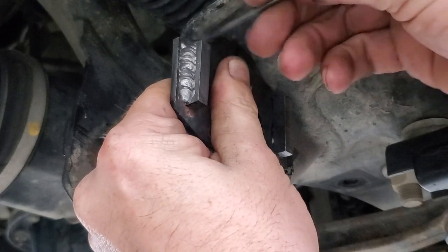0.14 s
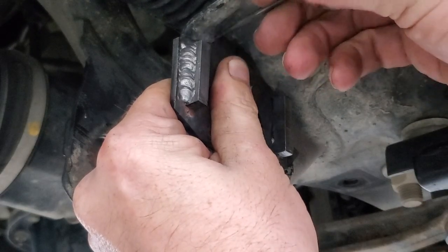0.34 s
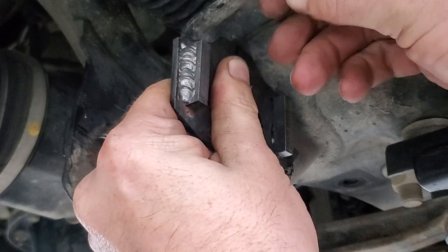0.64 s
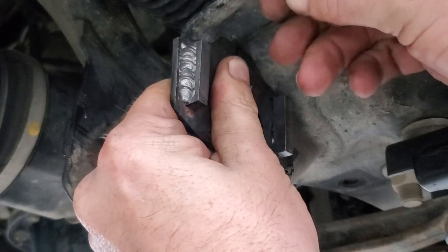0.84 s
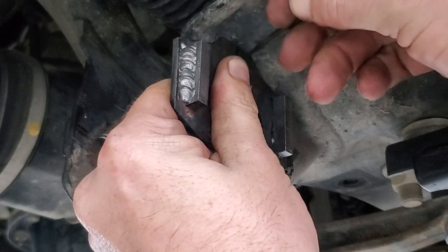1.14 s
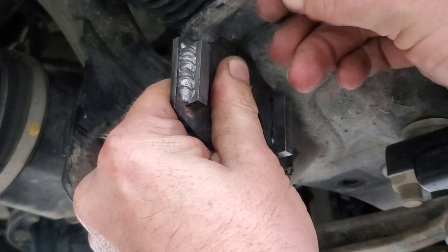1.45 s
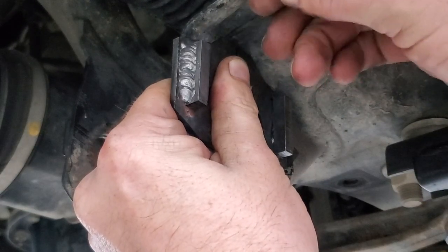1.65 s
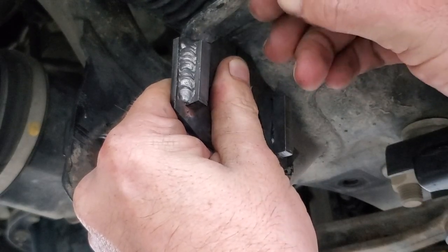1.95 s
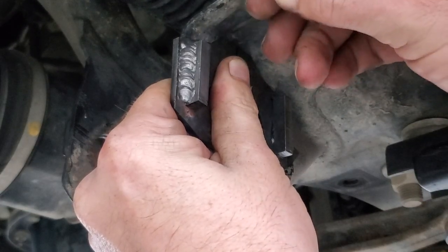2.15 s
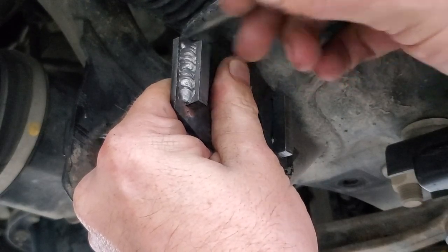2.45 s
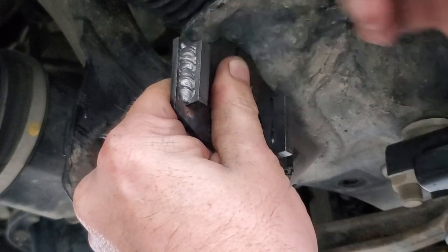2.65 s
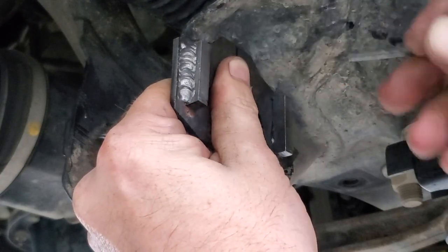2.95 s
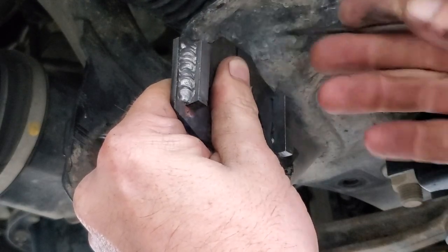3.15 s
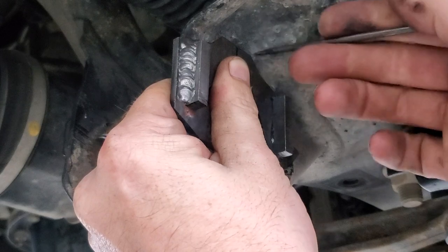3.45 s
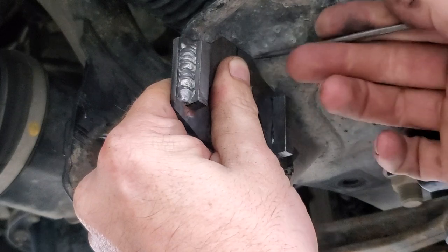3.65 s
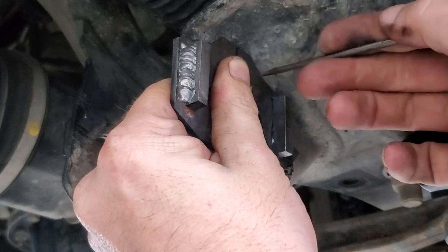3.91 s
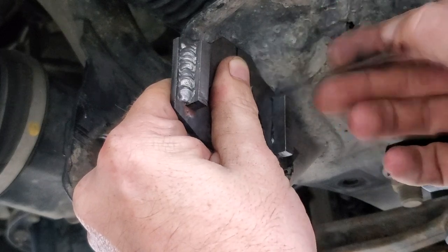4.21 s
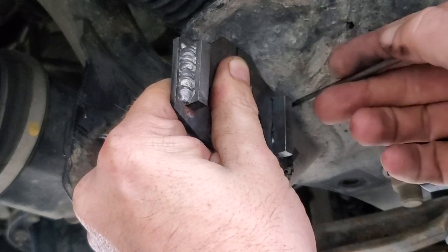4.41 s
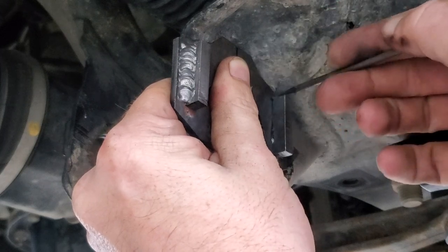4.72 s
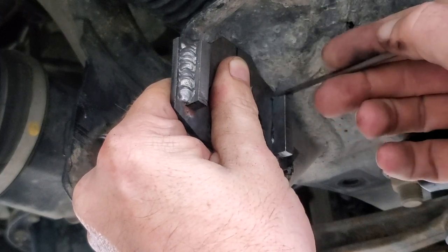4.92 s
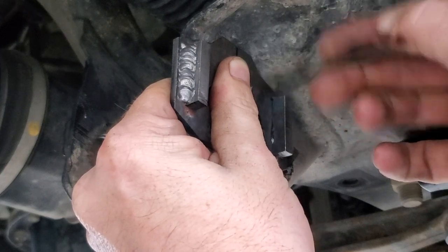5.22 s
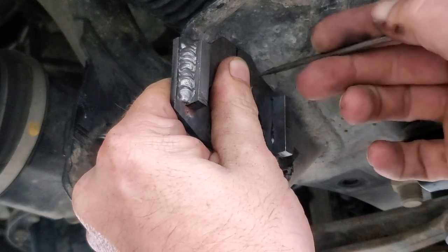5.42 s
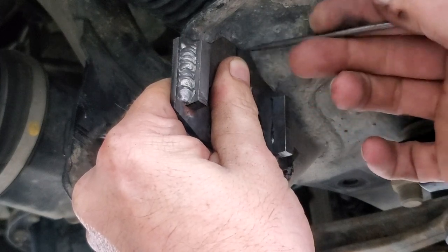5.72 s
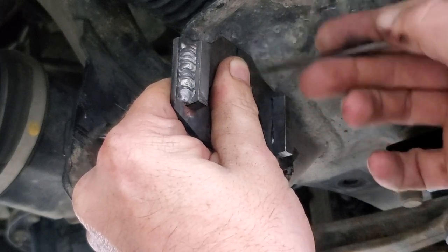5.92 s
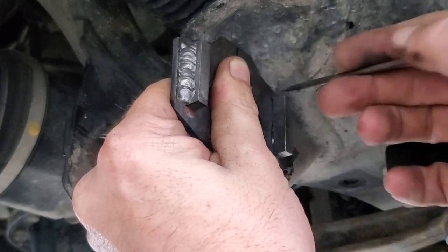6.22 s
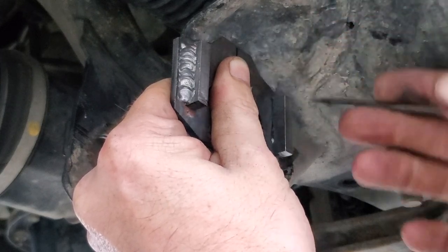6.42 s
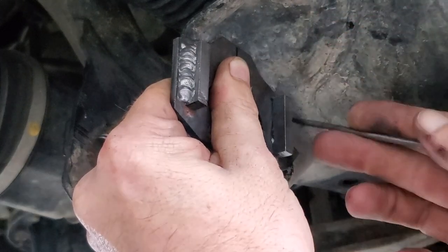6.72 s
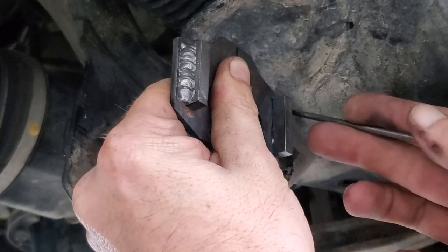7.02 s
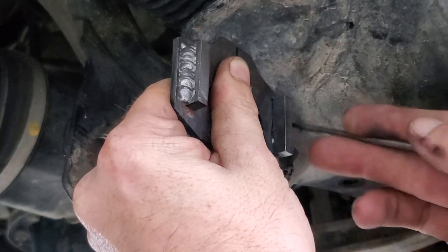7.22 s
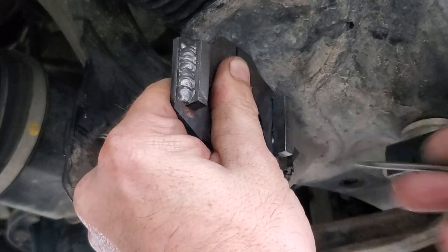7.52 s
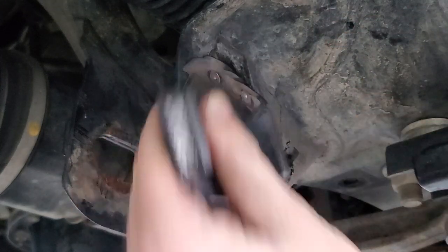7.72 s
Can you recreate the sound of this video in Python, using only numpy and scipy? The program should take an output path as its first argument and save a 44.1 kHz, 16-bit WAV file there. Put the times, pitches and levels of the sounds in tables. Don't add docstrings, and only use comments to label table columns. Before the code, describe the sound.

Throughout, a distant motor hums low and unsteadily over dull garage rumble, strongest near the end. Close up, a thin steel pick gives light, bright ticks at 0.1-0.2 and 0.35 s. From 0.5 to 1.15 it pries hard: loud, irregular clacks with short metallic rings and a tiny groan near 0.63, strongest around 0.75, 0.9 and 1.02. Lighter ticks cluster at 1.3-1.6, then sparse faint ones at 2.1-2.3 and a quick scrape with ticks at 2.45-2.5. After a quiet gap, ticks run at 3.8-4.1, with firmer, duller taps at 4.27 and 4.49. Sparse clicks follow, taps at 5.56 and 5.7, a busy cluster at 5.9-6.2, then near quiet. A scrape swells to a sharp tick at 7.43. From 7.64 the bracket drags, squeaks and knocks heavily on the frame, hardest at 7.78 and 7.82, ringing briefly with short echoes.

```python
import sys
import numpy as np
from scipy import signal
from scipy.fft import rfft, irfft, next_fast_len
from scipy.io import wavfile
from scipy.ndimage import uniform_filter1d

SR = 44100
rng = np.random.default_rng(int(sys.argv[2]) if len(sys.argv) > 2 else 0)


def to_wav(sig):
    pcm = np.clip(np.atleast_2d(sig), -1, 1) * 32767
    pcm = np.round(pcm).astype(np.int16)
    wavfile.write(sys.argv[1], SR, pcm.T)


def nominal_scale(level):
    x = np.asarray(level, float) / 20
    return 10 ** x


N = 346625

# start_s, blow_db, crack_db, pitch_hz
EDGE_TICKS = [(0.1232, -21, -31.5, 1940), (0.1386, -13, -20.5, 2090), (0.1784, -17, -23, 2450),
              (0.1845, -20.5, -13.5, 2500), (0.3404, -28.5, -6, 2130), (0.3446, -22, -8.5, 2270),
              (0.3551, -21, -17, 2250), (1.3082, -24, -18, 2680), (1.3369, -20, -12, 2190),
              (1.3434, -24.5, -15, 3300), (1.3934, -20, -18.5, 2100), (1.3982, -24, -13, 2240),
              (1.4454, -23, -24, 2100), (1.456, -18.5, -10, 3300), (1.4654, -21, -10, 2680),
              (1.5732, -45, 11, 2900), (1.5775, -18, -7, 2580), (2.0872, -30.5, -10, 1600),
              (2.0936, -25, -17, 2120), (2.1154, -40, -9, 1990), (2.2503, -24.5, -22, 2200),
              (2.2604, -31.5, -8.5, 2300), (2.2844, -33, -17.5, 2140), (2.4414, -23, -12.5, 2180),
              (2.4483, -18, -15, 2070), (2.749, -28.5, 0, 2600),
              (3.1724, -32, -2, 2450), (3.1983, -34.5, -9.5, 2290), (3.488, -38.5, -20, 1360),
              (3.5467, -25.5, -12.5, 2870), (3.8369, -24, -18.5, 2980), (3.8573, -23.5, -9, 2270),
              (3.8689, -30, -8.5, 2380), (3.9, -20.5, -5, 3380), (3.909, -18.5, -10, 2670),
              (3.9801, -21.5, -3.5, 2320), (3.9854, -18, -29, 2680), (3.9998, -19, -8, 2430),
              (4.0067, -39.5, -10.5, 2070), (4.023, -22.5, -18, 2250), (4.0624, -28.5, -24, 2440),
              (4.1128, -22.5, -21.5, 2080), (4.7199, -32, -7.5, 2090), (4.8767, -30.5, -5.5, 2350),
              (4.9387, -33.5, -20, 2000), (4.9696, -19.5, -18, 2140),
              (5.2584, -28, -3.5, 2190), (5.2664, -25.5, 5.5, 2350), (5.4164, -43, 1, 1480),
               (5.4216, -23, -14, 2110), (5.6964, -24, -38, 2080), (5.7064, -28.5, -2, 3300),
               (5.7952, -33, -9.5, 2350), (5.8466, -32.5, -16.5, 2350), (5.9224, -17.5, -18, 2440),
               (5.9294, -17.5, -15, 2080), (6.0477, -27.5, -17, 2300), (6.0646, -18, -11.5, 2400),
               (6.0704, -17.5, -11.5, 2180), (6.1004, -30.5, -14, 2400), (6.1699, -38, -20, 2270),
               (6.1918, -24.5, -17, 2240), (6.2114, -34, -5.5, 2360), (6.6248, -28.5, -26, 2330),
               (6.9294, -43, -16, 2260), (7.3886, -32, -9, 2830), (7.4434, -16.5, -14.5, 2200)]
# start_s, blow_db, crack_db, pitch_hz, low_tones_db
FACE_TAPS = [
    (2.4814, -19.5, -23, 1400, -22),
    (2.4994, -39, -15, 1400, -4),
    (4.2674, -19, -26.5, 1380, -35),
    (4.2727, -14, -11, 2560, -11.5),
    (4.2804, -18.5, -32, 2230, -17),
    (4.4866, -23, -10.5, 2330, -17),
    (5.5564, -25, -10, 2980, -18),
    (5.5615, -17.5, -12.5, 2240, -19.5),
    (5.7069, -17.5, -51, 2300, -23),
]
# pitch_hz, level_db, fade_by_60_db_s
LIGHT_BRACKET = [(691.4, -5.5, 0.14), (815, 1, 0.1), (1064, -13, 0.3), (1330, -15, 0.07),
                 (1700, -36.5, 0.3), (1970, 0, 0.09), (2181, -0.5, 0.061), (2480, -6, 0.06),
                 (2670, -2.5, 0.053), (2270, -2, 0.06), (2937, -8, 0.038), (3300, -5, 0.047),
                 (3580, -8, 0.07)]


def ticks():
    low_db = -51
    edge = [(*row, low_db - row[1]) for row in EDGE_TICKS]
    events = contacts(edge + FACE_TAPS, catch_ms=2.1, snap_ms=1.12, release_ms=3.05)
    return struck(events, LIGHT_BRACKET, ring_db=-7.5, focus_db=9.0, longest_s=0.14)


# start_s, blow_db, crack_db, pitch_hz, low_tones_db
PRIES = [(0.5274, -24, -11, 2500, -11.5), (0.5337, -21.5, -12, 1700, -23.5),
         (0.5636, -10, -20.5, 2930, -19), (0.5754, -26, -25, 3320, -2.5), (0.6205, -22, -40, 2000, -16),
         (0.6334, -24, -24, 1460, -11.5), (0.6394, -21, -38, 1510, -13.5), (0.6504, -21, -46, 2230, -12),
         (0.6712, -16.5, -37.5, 1655, -15), (0.7487, -7.5, -25.5, 1610, -42),
         (0.7554, -14.5, -30.5, 2315, -27.5), (0.7982, -11.5, -26, 2596, -27.5),
         (0.8918, -12.5, -29.5, 2700, -24), (0.8984, -6, -21, 2990, -19.5),
         (0.9064, -10.5, -33.5, 2180, -21), (0.9482, -22.5, -35, 1980, -20),
         (1.0054, -25, -22, 2560, -39.5), (1.0156, -7.5, -22, 2730, -24), (1.0185, -9, -44.5, 2170, -37),
         (1.0354, -10.5, -29, 3370, -25), (1.0425, -9.5, -19, 3100, -21.5),
         (1.1069, -9.5, -19.5, 3160, -29.5), (1.1523, -20, -17, 1990, -40)]
# pitch_hz, level_db, fade_by_60_db_s
LOADED_BRACKET = [(694, -7.5, 0.39), (771, 1, 0.15), (1045, -22, 0.12), (1380, -2, 0.064),
                  (1488, 4.5, 0.055), (1730, 0, 0.085), (1780, -47, 0.1), (2015, -3.5, 0.09),
                  (2235, 23, 0.044), (2350, 1.5, 0.096), (2800, -21.5, 0.061), (2808, -8, 0.043),
                  (3026, 15, 0.026), (3224, 7, 0.035), (3670, -43, 0.054), (3480, -41.5, 0.041),
                  (5730, -4, 0.011)]


def pries():
    events = contacts(PRIES, catch_ms=2.8, snap_ms=0.84, release_ms=1.66)
    return struck(events, LOADED_BRACKET, ring_db=-2.0, focus_db=9.5, longest_s=0.28)


# start_s, blow_db, crack_db, pitch_hz, low_tones_db
KNOCKS = [
    (7.637, -34.5, -24, 2160, -12),
    (7.6825, -36, -14, 2240, -1),
    (7.7012, -22.5, -30, 2500, -7.5),
    (7.7354, -25.5, -17.5, 2170, -31),
    (7.7554, -18.5, -23, 2170, -15),
    (7.7788, -7.5, -18.5, 2500, -13),
    (7.7885, -11, -10, 2260, -9.5),
    (7.8185, -2, -9, 2530, -16.5),
    (7.8235, -10, -6, 2464, -15),
]
# pitch_hz, level_db, fade_by_60_db_s
FRAME = [(512, -4.5, 0.53), (965, 3, 0.074), (791, -1, 0.041), (1444, 10, 0.072), (2180, 4, 0.18),
         (2503, 13, 0.071), (2894, -19, 0.034), (3100, 16, 0.07), (3800, -17, 0.045), (4260, 12, 0.04),
         (5600, 7.5, 0.03)]


def knocks():
    events = contacts(KNOCKS, catch_ms=2.2, snap_ms=1.7, release_ms=3.2)
    rings, thuds, cracks = struck(events, FRAME, ring_db=-6.5, focus_db=14.5, longest_s=0.69)
    return rings, thuds, signal.lfilter([.5], [1, -.7], cracks)


def contacts(rows, catch_ms, snap_ms, release_ms):
    gap_s = .012
    s, blow, crack, hz, low = np.transpose(sorted(rows))
    caught = (np.diff(s, append=N) < gap_s) & (np.diff(blow, append=0) > 1)
    fresh = np.diff(s, prepend=-1) > gap_s
    length_ms = np.where(caught, catch_ms, np.where(fresh, snap_ms, release_ms))
    return np.transpose([s, blow, low, crack, hz, length_ms])


def slips(events, shorten):
    t = (np.arange(800) + 1) / SR
    length = np.clip(events[:, 5:] * shorten, .1, 10) / 1000
    draws = rng.standard_normal((len(events), 2, len(t)))
    uneven = draws[:, 0] * nominal_scale(4.0 * draws[:, 1])
    force = uneven * (t / length) ** 0.3 * np.exp(-t / length)
    force /= np.sqrt(np.sum(force ** 2, axis=1, keepdims=True))
    at = np.minimum((events[:, :1] * SR).astype(int) - 20 + np.arange(len(t)), N - 1)

    def train(db):
        return np.bincount(at.ravel(), (force * nominal_scale(db)[:, None]).ravel(), N)
    return force, train


def struck(events, modes, ring_db, focus_db, longest_s):
    force, train = slips(events, shorten=1.0)
    _, blow, low_db, crack, pitch, _ = events.T
    hz, mode_db, t60 = np.transpose(modes)
    octaves = np.log2(hz / pitch[:, None])
    away = np.minimum(np.abs(octaves), np.abs(octaves - 1) + 0.14)
    share = .5 * mode_db - focus_db * np.minimum(away * 6, 1)
    share += 2.5 * rng.standard_normal(share.shape)
    low = hz < 1200
    for group in low, ~low:
        share[:, group] -= 10 * np.log10(nominal_scale(2 * share[:, group]).sum(axis=1, keepdims=True))
    blunt_db = np.clip(-.4 * (crack + 22), -3, 13)
    share += np.where(low, low_db[:, None] + 3, ring_db + 0.15 * blunt_db[:, None])
    share -= (hz > 4500) * 1.5 * blunt_db[:, None]
    waves = np.exp(2j * np.pi * np.outer(np.arange(force.shape[1]), hz) / SR)
    reach = np.abs(force @ waves)
    share -= 20 * np.log10(np.maximum(reach, .3))
    fade = np.clip(t60, .02, longest_s)
    rings = sum(ring(train(blow + share[:, k]), hz[k], fade[k]) for k in range(len(hz)))
    thuds = train(blow + 4 - blunt_db)
    _, crack_train = slips(events, shorten=.46)
    return rings, thuds, crack_train(blow + crack + 21)


def ring(force, hz, t60):
    r, w = nominal_scale(-60 / (t60 * SR)), 2 * np.pi * hz / SR
    near = np.concatenate(signal.iirpeak(hz, 5.0, fs=SR))
    resonance = [0, np.sin(w), 0, 1, -2 * r * np.cos(w), r * r]
    tone = signal.sosfilt([near, resonance], force + 1e-18)
    delay = int(rng.uniform(1.3, 24) * min(hz / 1800, 1) ** 2)
    return balance(hz) * np.array([tone, np.roll(tone, delay)])


# start_s, length_s, from_hz, to_hz, level_db
GROANS = [
    (0.612, 0.018, 1900, 2100, -31),
    (0.636, .023, 2200, 2260, -20.5),
    (0.628, 0.031, 1400, 1560, -21.5),
    (0.630, .04, 750, 780, -31),
    (2.444, 0.012, 2100, 2160, -28),
    (7.722, .052, 3150, 3140, -30),
    (7.746, 0.026, 2160, 2180, -29),
    (7.781, 0.019, 5430, 5500, -27),
]
# start_s, length_s,
# from_hz, to_hz, level_db
RINGS = [(0.562, 0.038, 3460, 3250, -28), (0.575, 0.057, 720, 700, -29.5), (0.6715, 0.055, 1680, 1720, -18),
         (0.672, 0.013, 3440, 3400, -20), (0.684, 0.046, 3330, 3320, -36), (0.754, 0.036, 2283, 2260, -22),
         (0.751, .012, 5700, 5680, -26.5), (1.337, 0.055, 3326, 3300, -35), (2.256, .05, 2240, 2180, -41.5),
         (2.327, 0.15, 2790, 2660, -51.5), (2.33, 0.021, 2520, 2520, -51), (2.455, .016, 2150, 2200, -28),
         (2.457, 0.058, 3540, 3560, -39), (5.935, 0.045, 2104, 2050, -31), (5.95, 0.059, 3300, 3270, -39),
         (6.068, 0.044, 3420, 3450, -34), (6.072, 0.043, 2710, 2610, -34), (7.68, 0.043, 9780, 9780, -39.5),
         (7.735, .022, 9830, 9700, -31.5), (7.753, 0.032, 9780, 9780, -29),
         (7.702, 0.033, 1230, 1150, -29.5), (7.69, .05, 5420, 5480, -46), (7.78, .035, 3155, 3050, -17),
         (7.818, 0.07, 4050, 4300, -16.5), (7.82, .014, 6330, 6330, -23), (7.837, .014, 2540, 2530, -26),
         (7.845, .02, 2600, 2530, -25),
         (0.181, 0.055, 4250, 4250, -38.5), (0.133, 0.044, 3300, 3400, -38),
               (0.9, 0.068, 2230, 2230, -22), (0.899, 0.016, 2900, 2870, -25),
               (0.899, .04, 1380, 1370, -25.5), (0.9, 0.098, 679, 670, -28),
               (1.016, 0.017, 5600, 5600, -24), (1.017, 0.028, 2210, 2220, -16),
               (1.014, .015, 3250, 3220, -22), (1.043, 0.037, 2330, 2286, -28),
               (1.043, .06, 3560, 3600, -32), (1.107, 0.028, 3190, 3300, -27.5),
               (2.748, .05, 3590, 3610, -44), (2.749, .03, 5070, 5170, -40), (2.75, .012, 7050, 7100, -44),
               (3.173, 0.015, 4460, 4430, -45), (3.982, 0.024, 2780, 2550, -27),
               (4.0, 0.022, 2250, 1950, -28), (4.058, 0.03, 2320, 2250, -38),
               (4.015, .035, 2280, 2230, -33), (4.07, .05, 2030, 1990, -38), (6.626, .025, 4600, 4650, -52),
               (6.628, .035, 3100, 3100, -49), (7.65, .04, 9780, 9780, -50), (4.11, .05, 2040, 1990, -37),
               (4.271, 0.042, 1606, 1600, -32), (5.272, .04, 3300, 3300, -44),
               (5.288, 0.036, 2256, 2260, -36.5), (5.286, 0.012, 1350, 1350, -39),
               (5.566, 0.076, 690, 680, -36.5), (5.558, .03, 1240, 1260, -34),
               (5.715, 0.053, 687, 694, -35), (5.708, 0.013, 2800, 2700, -27.5),
               (5.712, 0.049, 1286, 1310, -32), (7.429, 0.047, 2400, 2250, -34),
               (2.501, 0.041, 1065, 950, -35.5),
         (0.674, .05, 730, 735, -30),
    (0.674, .04, 2500, 2500, -32),
    (7.815, .12, 512, 511, -25),
    (7.7, .02, 2520, 2520, -30),
    (0.142, .035, 1300, 1280, -38),
    (4.274, .05, 850, 830, -31),
    (5.71, .035, 3200, 3150, -35),
    (3.174, .05, 2350, 2300, -46),
    (4.49, .05, 2300, 2150, -43),
    (7.785, .04, 970, 965, -27),
]
# start_s, length_s, pitch_hz, width_hz, level_db
BRUSHES = [(6.385, .16, 5450, 800, -62.5), (5.03, .12, 5100, 1300, -65), (6.384, .018, 5400, 1000, -55),
           (7.418, .04, 4600, 3000, -33), (2.54, .13, 4300, 3500, -52.5), (7.28, .13, 5000, 2000, -50),
           (7.546, .05, 13500, 3500, -56), (6.534, .006, 5200, 2500, -58), (6.91, .005, 7000, 6000, -58),
           (7.231, .005, 9000, 5000, -60), (7.303, .008, 11000, 7000, -50), (2.562, .03, 13500, 4000, -55),
           (2.474, .007, 12000, 7000, -44), (2.576, .008, 8500, 3000, -52)]


def squeaks():
    def swell(u):
        return u ** 0.7 * np.minimum(8.6 * (1 - u), 1)

    def dying(u):
        return np.minimum(40 * u, 1) * (1 - u) ** 2.04

    def brush(u):
        return np.minimum(np.minimum(6.5 * u, 2.0 * (1 - u)), 1)

    out = np.zeros((2, N + SR))
    for rows, shape in (GROANS, swell), (RINGS, dying):
        for start, length, hz, end_hz, db in rows:
            add(out, start, sing(length, hz, end_hz, db, .035 * hz, .35, shape))
    for start, length, hz, width, db in BRUSHES:
        add(out, start, sing(length, hz, hz, db, width, 0.84, brush))
    return out[:, :N]


def sing(length, hz, end_hz, db, width_hz, lump, shape):
    t = np.arange(int(length * SR)) / SR
    draws = rng.standard_normal((2, 9000))
    lag = rng.uniform(0, 2 * np.pi) * min(hz / 1800, 1) ** 2
    r = np.exp(-np.pi * width_hz / SR)
    waver = signal.lfilter([1], [1, -2 * r, r * r], draws[0] + 1j * draws[1])[-len(t):]
    start_phase = np.angle(waver[len(t) // 8])
    waver = waver * np.exp(-1j * start_phase) / np.sqrt(np.mean(np.abs(waver) ** 2))
    waver = 1 - lump + lump * waver
    glide = hz * t + (end_hz - hz) * t ** 2 / (2 * length)
    turn = 2 * np.pi * glide + np.array([[0], [lag]])
    return nominal_scale(db + 3) * balance(hz) * shape(t / length) * np.imag(waver * np.exp(1j * turn))


def add(out, start, piece):
    out[:, int(start * SR):][:, :piece.shape[1]] += piece


# full_from_s, held_s, swell_s, body_db, hiss_over_body_db
RUBS = [
    (2.443, 0.042, 0.003, -44, -5.5),
    (2.502, 0.089, .02, -48, -8.5),
    (2.72, 0.1, 0.073, -65, 1),
    (3.99, 0.16, 0.0079, -53, -14),
    (5.93, 0.012, 0.019, -39.5, -7),
    (6.1, 0.011, 0.22, -52, -8),
    (7.3, 0.09, 0.2, -46, -10),
    (7.424, 0.024, 0.02, -37, -2.5),
    (7.56, 0.064, 0.058, -67, 4),
    (7.71, .15, 0.1, -41, -11.5),
]


def pressure():
    t, body, hiss = np.arange(0, N + 32, 32) / SR, -120.0, -120.0
    for s, held, swell, body_db, hiss_db in RUBS:
        before_db = 19.5 * (s - t) / max(swell, .002)
        after_db = 251 * (t - s - held)
        db = body_db - np.maximum(before_db, np.maximum(after_db, 0))
        body, hiss = np.maximum(body, db), np.maximum(hiss, db + hiss_db)
    return [np.interp(np.arange(N) / SR, t, db) for db in (body, hiss)]


# pitch_hz, level_db_per_hz
BODY = [(590, -62), (1000, 2.5), (1660, 4.5), (1860, -42), (2260, 17), (3450, -7), (3990, -17), (5710, -3),
        (7000, -59), (9100, -82), (15400, -120)]
# pitch_hz, level_db_per_hz
CRACK = [(2350, -27.5), (4000, -6.5), (4800, 2), (5700, -1), (6800, -4), (8700, -0.5), (10000, -11.5),
         (10800, 1.5), (14800, 1.5), (16500, -79)]


def rubbing():
    lumps = 2.3 * rms_one(uniform_filter1d(rng.standard_normal(N), size=260))
    grit = rng.standard_normal((2, N)) * nominal_scale(5.0 * rng.standard_normal(N) + lumps)
    body_db, hiss_db = pressure()
    body = rms_one(shaped(grit[0], BODY))
    hiss = rms_one(shaped(signal.lfilter([1], [1, -.8], grit[1]), CRACK))
    return nominal_scale(body_db) * body + nominal_scale(hiss_db) * hiss


def shaped(force, spectrum):
    hz = np.linspace(0, SR / 2, 500)
    tone = colour(force, causal(spectrum)) / np.sqrt(np.mean(nominal_scale(2 * at_hz(spectrum, hz))))
    late = rms_one(np.roll(tone, 9) - 0.067 * np.roll(tone, 23)) * np.std(tone)
    return colour(np.array([tone, late]), balance)


def causal(points):
    hz = np.linspace(0, SR / 2, 2049)
    fold = irfft(np.log(nominal_scale(at_hz(points, hz)))) * np.r_[1, np.full(2047, 2), 1, np.zeros(2047)]
    phase = rfft(fold).imag
    return lambda f: nominal_scale(at_hz(points, f)) * np.exp(1j * np.interp(f, hz, phase))


# pitch_hz, left_minus_right_db
LEFT_LEAD = [(400, -14), (700, 1), (1400, 3.5), (2800, 8.5), (5600, -4.5), (11000, 2), (15000, -3.5)]


def balance(hz):
    return nominal_scale(at_hz(LEFT_LEAD, hz) / 2 * np.array([[1], [-1]]))


def chassis(x):
    t = np.arange(SR // 5) / SR
    tail = rng.standard_normal((2, len(t))) * nominal_scale(-60 * t / .12) * (t > .002)
    tail = nominal_scale(-10) * tail / np.sqrt(np.sum(tail ** 2, axis=1, keepdims=True))
    tail = signal.sosfilt(signal.butter(2, 3600, fs=SR, output="sos"), tail)
    return signal.oaconvolve(x, tail, axes=1)[:, :N]


# pitch_hz, fade_by_60_db_s
ECHO_T60 = [(700, 0.89), (1500, 0.46), (3000, 0.3), (6000, 0.17), (14000, 0.12)]


def echoes(x, near_db, far_db, near_t60):
    out, white = 0, rng.standard_normal((2, 2, N))
    for k, hz in enumerate(800 * 2 ** np.arange(0, 4.6, .5)):
        band = signal.butter(2, [hz / 2 ** .25, hz * 2 ** .25], "band", fs=SR, output="sos")
        energy, stored = signal.sosfilt(band, x) ** 2, 1e-18
        near = near_db - 2.0 * (hz > 4000), near_t60 * min(4000 / hz, 1) ** .3
        far = far_db, at_hz(ECHO_T60, hz)
        for db, t60 in (near, far):
            r = nominal_scale(-120 / (max(t60, .01) * SR))
            stored = stored + nominal_scale(2 * db) * signal.lfilter([1 - r], [1, -r], energy)
        level = np.sqrt(uniform_filter1d(stored, size=88, origin=43))
        out = out + level * rms_one(signal.sosfilt(band, white[k % 2]))
    return out


# time_s, level_db, strain_db (moves power from the second tone to the third)
HUM = [(0, -51, -5.5), (.5, -43.5, -2.5), (1.8, -43.5, -4), (2.9, -45, -3), (3.6, -51, -1),
       (4.2, -45.5, 1.5), (4.7, -46.5, 3), (5.5, -39, 4.5), (6.3, -44, 3), (6.9, -41.5, -4),
       (7.3, -34.5, -7), (7.86, -40, -2.5)]
# pitch_hz, width_hz
HUM_LINES = [(73.5, 4.9), (148, 2.6), (221.5, 0.67), (249, 5.6)]


def hum():
    level, strain = in_time(HUM, -45)
    upper = level.mean() + 0.17 * (level - level.mean())
    levels = np.array([level, upper - strain, upper + strain, upper + strain])
    levels += np.array([[-0.5], [-8.5], [-13], [-15.5]])
    return sum(nominal_scale(db) * narrow(hz, width, alike=1.0) for db, (hz, width) in zip(levels, HUM_LINES))


def narrow(hz, width_hz, alike):
    white = rng.standard_normal((2, N))
    mid, side = colour(white, lambda f: 1 / (1 + (2 * (f - hz) / width_hz) ** 2))
    mid = mid / (uniform_filter1d(mid ** 2, size=9000) + .1 * np.var(mid)) ** 0.4
    return rms_one(mid + np.sqrt(1 - alike) * side * [[1], [-1]])


# pitch_hz, level_db_per_hz
RUMBLE = [(15, -54.5), (25, -22.5), (76, -5), (103, -11.5), (150, -11), (182, -17.5), (220, -19),
          (669, -22), (726, -25), (809, -23.5), (927, -27), (1930, -38.5), (5570, -53.5), (11600, -56.5),
          (16500, -56.5)]
# time_s, level_db
RUMBLE_LEVEL = [(0.0, -39), (0.94, -37.5), (1.4, -41.5), (7.49, -37.5), (7.86, -36.5)]
# pitch_hz, likeness (1 = same, below 0 = opposed)
LIKENESS = [(60, 1), (150, 0.96), (380, 0.78), (950, 0.022), (2380, -0.15), (5980, -0.31), (15000, 0.018)]


def rumble():
    def gain(hz):
        notch_db = 9.8 * np.exp(-((hz - 8000) / 1300) ** 2)
        alike = np.clip(at_hz(LIKENESS, hz), -1, .99) * np.array([[1], [-1]])
        return nominal_scale(at_hz(RUMBLE, hz) - notch_db) * np.sqrt(1 + alike)

    mid, side = colour(rng.standard_normal((2, N)), gain)
    return nominal_scale(in_time(RUMBLE_LEVEL, -48)[0] - 3.5) * rms_one(np.array([mid + side, mid - side]))


def in_time(rows, silent):
    s, *columns = np.transpose(rows)
    return [np.interp(np.arange(N) / SR, s, c, left=silent, right=silent) for c in columns]


def at_hz(points, hz):
    table_hz, values = np.transpose(points)
    return np.interp(np.log(hz + 1), np.log(table_hz + 1), values)


def rms_one(x):
    return x / np.sqrt(np.mean(x ** 2) + 1e-20)


def colour(x, gain):
    size = next_fast_len(N + SR // 10)
    hz = np.arange(size // 2 + 1) * SR / size
    return irfft(rfft(x, size) * gain(hz), size)[..., :N]


def scene():
    rings, thuds, cracks = (a + b + c for a, b, c in zip(ticks(), pries(), knocks()))
    too_small_for_bass = signal.butter(4, 470, "high", fs=SR, output="sos")
    rings = signal.sosfilt(too_small_for_bass, rings) + squeaks()
    dense = shaped(thuds, BODY) + shaped(cracks, CRACK) + rubbing()
    tails = echoes(dense + nominal_scale(-6.5) * rings, near_db=0.5, far_db=-8.5, near_t60=0.034) + chassis(rings)
    return rings + dense + tails + hum() + rumble()


def roll_off(x):
    return signal.sosfilt(signal.butter(12, 17000, fs=SR, output="sos"), x)


def record(dry):
    def dips(f):
        return nominal_scale(-4.0 * np.exp(-((f - 4800) / 350) ** 2) - 1.5 * np.exp(-((f - 7000) / 500) ** 2))

    rounded = np.tanh(colour(dry, dips))
    mix = signal.sosfilt(signal.cheby2(10, 22, 16200, fs=SR, output="sos"), rounded)
    return roll_off(mix)


dry = scene()
out = record(dry)
to_wav(out)
```